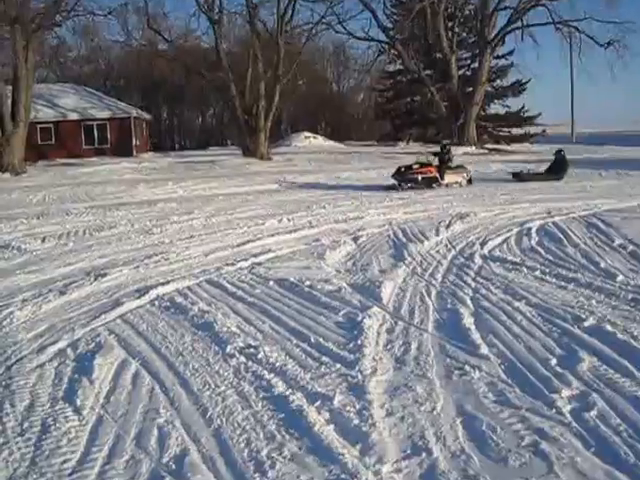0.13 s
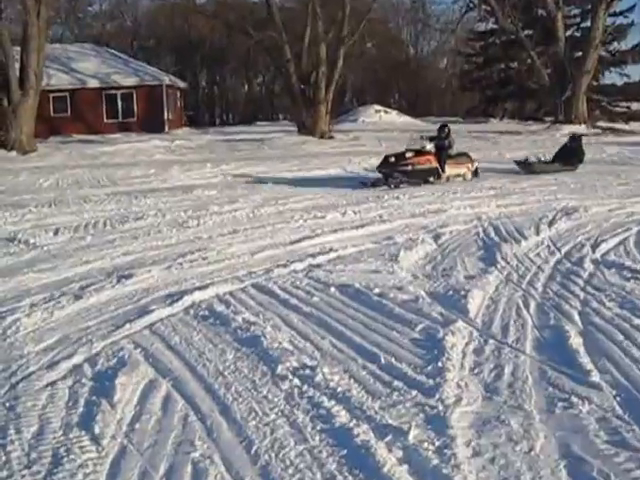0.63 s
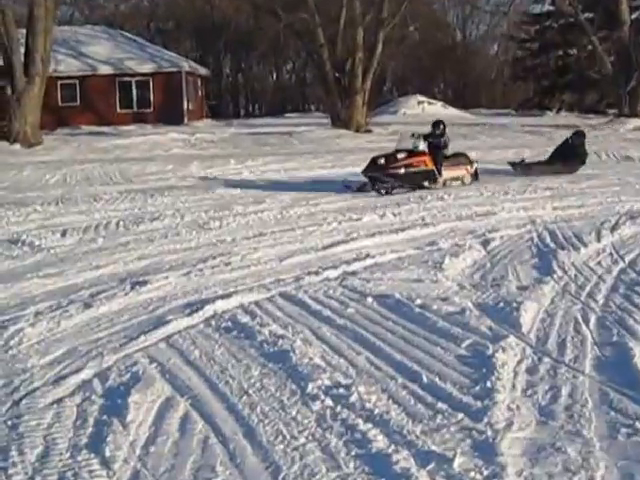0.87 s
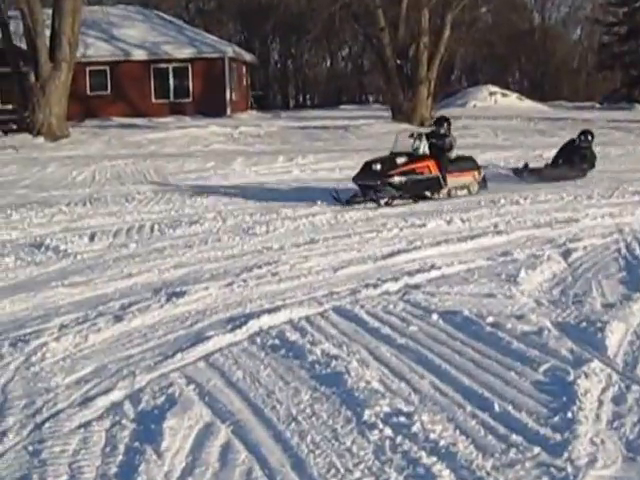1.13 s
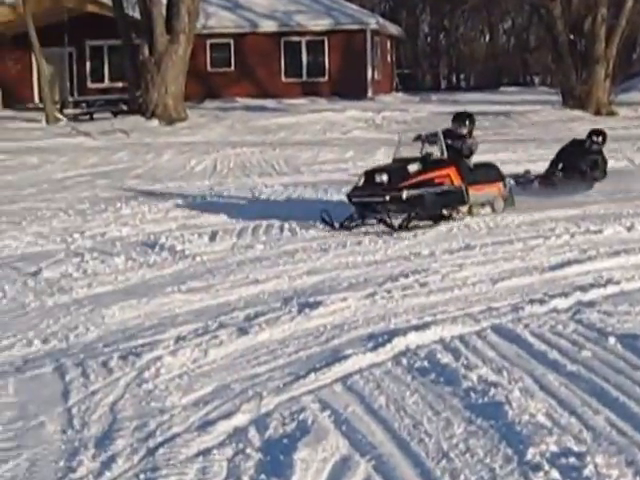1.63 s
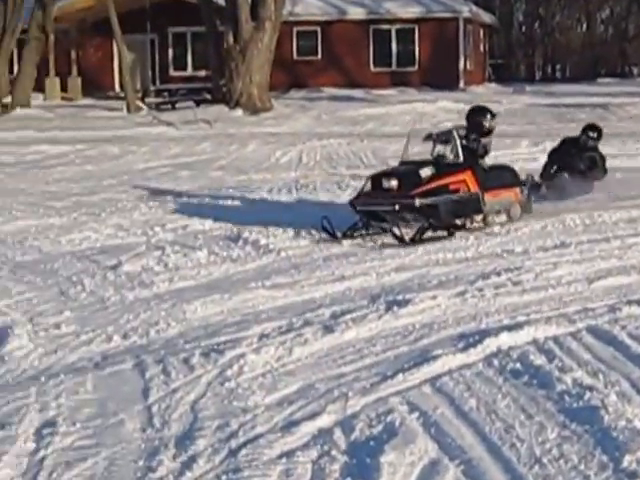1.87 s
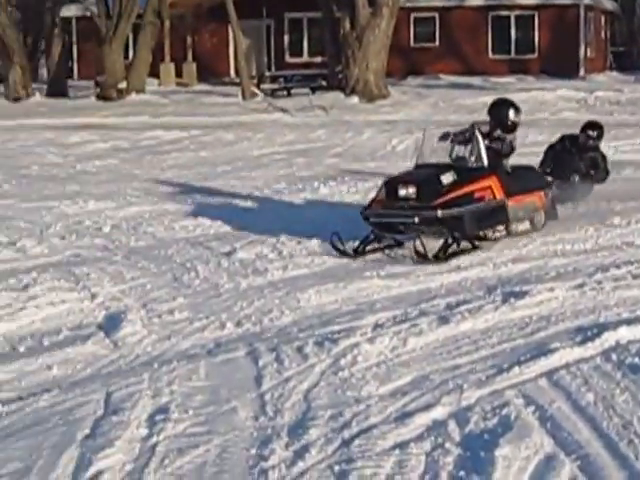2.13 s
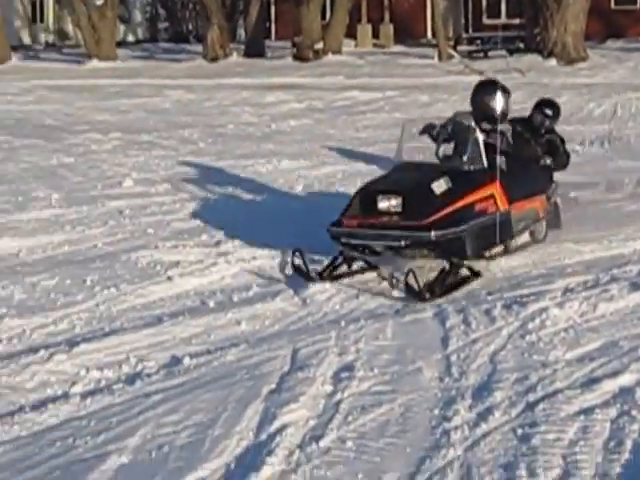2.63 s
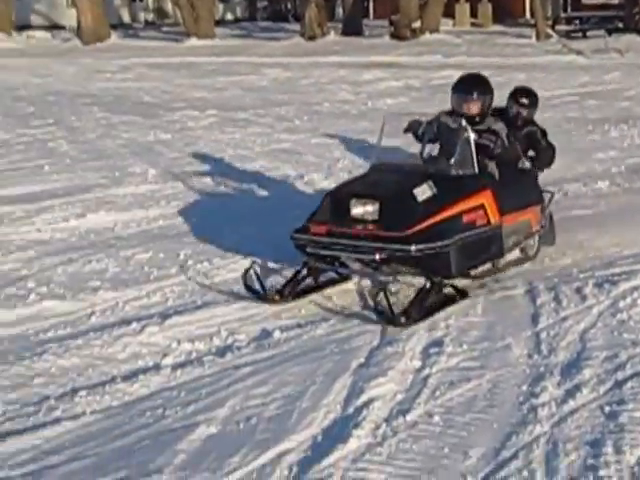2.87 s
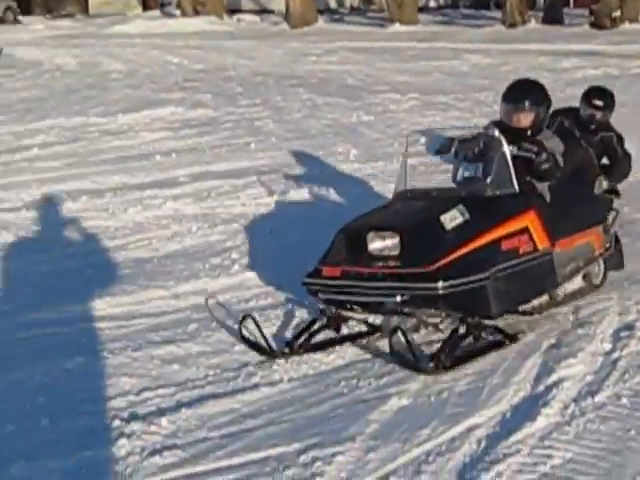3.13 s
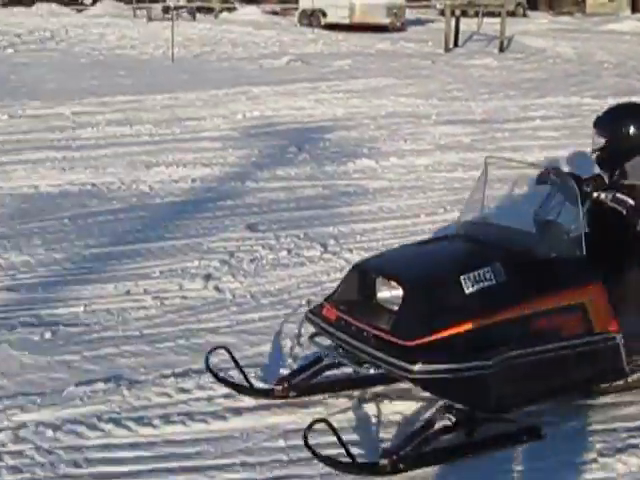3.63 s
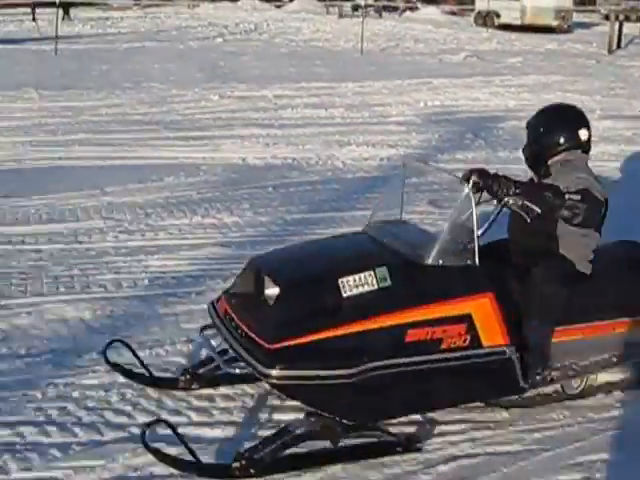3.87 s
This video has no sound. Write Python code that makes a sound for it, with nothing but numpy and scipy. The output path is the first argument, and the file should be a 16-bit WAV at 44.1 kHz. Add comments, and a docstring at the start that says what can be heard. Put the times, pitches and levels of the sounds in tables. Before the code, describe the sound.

A two-stroke snowmobile engine buzzes closer across snow, drops pitch and sputters, then catches again.

```python
"""A two-stroke snowmobile comes across a snowy yard and passes close; near the listener it misfires, then
catches again. Low exhaust orders are clean tones, the buzz is a stack of higher orders, and the roar and
hiss are noise gated by the firing; buzz and roar arrive with a short inverted echo. Puffs of gas mark relighting.
The hand-held camera clicks now and then and a finger slips on it: short rings with noise, and a scrape of
band noise. Loud clicks overload the input and duck its gain control."""
import sys
import numpy as np
from scipy import signal
from scipy.fft import rfft, irfft, next_fast_len
from scipy.io import wavfile
from scipy.ndimage import map_coordinates

SR = 44100
rng = np.random.default_rng(int(sys.argv[2]) if len(sys.argv) > 2 else 0)


def ratio_of_db(decibels):
    """Turn decibels (scalar or array-like) into linear amplitude factors; 0 dB maps to 1."""
    return 10 ** (np.asarray(decibels, float) / 20)


def to_wav(sig):
    """Store sig (one row per channel, or 1-D mono) as 16-bit WAV at the path in sys.argv[1].

    Samples outside -1..1 are clipped; the rate is SR.
    """
    pcm = np.clip(np.atleast_2d(sig), -1, 1) * 32767
    pcm = np.round(pcm).astype(np.int16)
    wavfile.write(sys.argv[1], SR, pcm.T)  # frames by channels


N = 176400

# Engine firing rate. Each row: time in seconds, rate in Hz.
FIRING_RATE_HZ = [(0.04, 78.53), (0.2, 79.66), (0.33, 79.5), (0.84, 81.53), (1.1, 82.7), (1.18, 83.95),
                  (1.29, 84.3), (1.42, 85.7), (1.46, 87.1), (1.54, 88.2), (1.67, 85), (1.87, 86.23),
                  (1.97, 85.76), (2.06, 85.3), (2.2, 87.4), (2.48, 86.72), (2.64, 84.94), (2.73, 85.8),
                  (2.91, 87.64), (2.95, 87.2), (3.01, 86.16), (3.16, 78.6), (3.25, 76.25), (3.38, 74.68),
                  (3.55, 74.15), (3.76, 76.1), (3.83, 75.76), (3.88, 75.9), (4.0, 76.5)]
# Approach. Each row: time in seconds, roar, buzz and hiss rms in dB before echo and misfires, nearness 0-1.
APPROACH = [(0, -30.5, -29.5, -38, 0.46), (.3, -29, -27.5, -35.5, 0.12), (.8, -27, -26.5, -36.5, 0.36),
            (1.3, -25.5, -23.5, -37, 0.4), (1.8, -19.5, -16, -28.5, 0.37), (2.4, -22.5, -20, -31.5, 0.59),
            (2.9, -24, -26, -35.5, 0.88), (3.2, -22, -29.5, -37.5, 0.98), (3.6, -22, -26, -32.5, 0.94),
            (4, -23.5, -26, -34.5, 0.8)]
# Exhaust orders before misfires. Each row: time in seconds, rms of orders 1, 2, 3 and 4 in dB.
ORDER_LEVELS_DB = [(0, -24.5, -32.5, -38.5, -42.5), (.3, -22.5, -31, -36, -41.5),
                   (.8, -22.5, -31.5, -39, -38.5), (1.3, -20.5, -28, -38.5, -37.5),
                   (1.8, -17, -23.5, -33.5, -30.5), (2.4, -20, -25.5, -35, -35.5),
                   (2.9, -23, -28, -36, -36.5), (3.2, -28.5, -27.5, -30.5, -34), (3.55, -20, -24, -24, -32),
                   (3.8, -20.5, -25, -24, -31), (4, -21.5, -23, -23, -27.5)]
# One value per exhaust order: phase in radians.
ORDER_PHASE_RAD = [3.1, 4.2, 5.6, 5.0]
# One value per exhaust order: spread of the random level in dB.
ORDER_WOBBLE_DB = [.8, 1.3, 1.6, 2.5]
# One value per exhaust order: share of the misfire dip that it follows, 0-1.
ORDER_MISFIRE_SHARE = [1, 0.041, 0.77, 0.36]
# Misfires, while the charge does not light. Each row: start in seconds, end in seconds, dip in dB.
MISFIRES = [(3.015, 3.058, -18), (3.1, 3.225, -17), (3.25, 3.278, -22), (3.318, 3.362, -22),
            (3.392, 3.428, -24), (3.46, 3.478, -10)]
# Puffs of gas as the charge lights again. Each row: start in seconds, length in seconds, level in dB.
PUFFS = [(3.082, .02, -43), (3.29, 0.025, -35), (3.367, 0.026, -33), (3.427, 0.032, -32.5),
         (3.479, 0.027, -33)]
# Buzz line levels, far and near. Each row: frequency in Hz, relative level in dB.
BUZZ_FAR_COLOUR = [(250, -28), (400, -18), (600, -1), (900, -17), (1100, -2), (1250, 4), (1450, 1.5),
                   (1700, -9.5), (2000, -12), (2500, -11), (3100, -6), (3600, -17), (4500, -15)]
BUZZ_NEAR_COLOUR = [(250, -12), (400, 6.5), (600, -6.5), (800, 6.5), (1000, 2), (1300, 4), (1700, -3.5),
                    (2200, -15.5), (2800, -2), (3600, -24), (4500, -10)]
# Noise spectra. Each row: frequency in Hz, relative density in dB per Hz.
ROAR_FAR_COLOUR = [(25, -2), (60, -9), (120, 4), (300, -19.5), (500, 4.5), (700, -7), (900, -4), (1400, -6),
                   (2200, -2), (3200, -11), (4500, -11.5), (5700, -11.5), (7000, -40)]
ROAR_NEAR_COLOUR = [(25, -19), (60, -25), (120, 13), (300, -2.5), (600, 4.5), (900, 1.5), (1400, 1),
                    (2200, -4.5), (2800, -6.5), (3400, -8.5), (4500, -10.5), (5700, -14.5), (7000, -28.5)]
HISS_COLOUR = [(4500, -2), (6000, 0), (7000, -7.5), (8500, -1), (10500, -6), (13000, -13.5), (15500, -7),
               (16500, -29)]
PUFF_COLOUR = [(2500, 1), (4000, -18), (6700, -6), (8500, -3), (13000, -7), (15500, -19), (16500, -37)]
# Echo delay. Each row: time in seconds, lag in ms.
ECHO_LAG_MS = [(0, 1.77), (1.5, 1.72), (2, 1.68), (2.5, 1.61), (3, 1.54), (3.5, 1.45), (4, 1.33)]
# Camera body clicks before the gain control. Each row: start in seconds, ring level in dB, ring frequency
# in Hz, ring T60 in seconds, crack level in dB relative to the ring, before the crack's band filter.
CLICKS = [(.2864, 7, 3790, .0046, -11), (1.3685, -9, 4400, .004, -12), (1.3752, -4, 3500, .004, -7),
          (1.4045, 19, 2440, .010, 4), (1.6503, -2, 800, .009, -30), (3.2585, -8, 3600, .003, -3)]
# Finger slip, one row: start in seconds, end in seconds, level at the end in dB, centre in Hz, width in Hz.
SLIP = (1.395, 1.4022, -13, 3100, 1800)


def in_time(rows):
    """Interpolate the columns of a time table to every sample."""
    time_s, *columns = np.transpose(rows)
    return [np.interp(np.arange(N) / SR, time_s, column) for column in columns]


def rms_one(x):
    """Scale to rms 1."""
    return x / np.sqrt(np.mean(x ** 2) + 1e-20)


def colour(x, points):
    """Minimum-phase filter that follows a spectrum table; rms 1."""
    size = next_fast_len(N + 8192)
    table_hz, table_db = np.transpose(points)
    bin_hz = np.arange(size // 2 + 1) * SR / size
    log_gain = np.interp(np.log(bin_hz + 1), np.log(table_hz), table_db) * np.log(10) / 20
    # Folding the cepstrum onto positive time gives the minimum phase.
    cepstrum = irfft(log_gain, size)
    cepstrum[1:size // 2] *= 2
    cepstrum[size // 2 + 1:] = 0
    response = np.exp(rfft(cepstrum))
    return rms_one(irfft(rfft(x, size) * response, size)[:N])


def drift(rate_hz, count=1):
    """Random change with spread 1 from a double pole at rate_hz, at every 40th sample."""
    r = np.exp(-2 * np.pi * rate_hz * 40 / SR)
    noise = rng.standard_normal((count, N // 40 + 2002))
    slow = signal.lfilter([1], [1, -2 * r, r * r], noise)[:, 2000:]
    return slow / slow.std(axis=1, keepdims=True)


def full(slow):
    """Interpolate from every 40th sample to every sample."""
    return np.interp(np.arange(N) / 40, np.arange(slow.size), slow.ravel())


def window(start_s, end_s, edge_s):
    """1 between start and end, with linear edges."""
    t = np.arange(N) / SR
    return np.clip(np.minimum(t - start_s, end_s - t) / edge_s + .5, 0, 1)


def exhaust_orders(turns, dip_db):
    """The four lowest harmonics of the firing as tones with wandering levels."""
    out = np.zeros(N)
    for k, level_db in enumerate(in_time(ORDER_LEVELS_DB)):
        wobble_db = ORDER_WOBBLE_DB[k] * full(drift(18.4))
        gain = ratio_of_db(level_db + ORDER_MISFIRE_SHARE[k] * dip_db + wobble_db)
        out += np.sqrt(2) * gain * np.cos(2 * np.pi * (k + 1) * turns + ORDER_PHASE_RAD[k])
    return out


def line_level_db(line_hz, points):
    """Level of each line from a colour table, on a log frequency axis."""
    table_hz, table_db = np.transpose(points)
    return np.interp(np.log(line_hz), np.log(table_hz), table_db)


def buzz(turns, rate_hz, near):
    """Higher firing orders, loosely in step so that each firing still makes a downward pulse; rms 1."""
    numbers = np.arange(5, 52)
    phase_spread_rad, wobble_db, flutter_db = .95, 2.5, 1.8
    whine_order, whine_db = 24, 8  # one order stands out as a whine
    k = numbers[:, None]
    line_hz = k * rate_hz[::40]
    far_db = line_level_db(line_hz, BUZZ_FAR_COLOUR)
    near_db = line_level_db(line_hz, BUZZ_NEAR_COLOUR)
    level_db = far_db + (near_db - far_db) * near[::40] ** 2 + whine_db * (k == whine_order)
    chance_db = wobble_db * drift(2.0, len(k)) + flutter_db * drift(30.0, len(k))
    gains = ratio_of_db(level_db + chance_db[:, :level_db.shape[1]])
    phases_rad = phase_spread_rad * rng.standard_normal(len(k))
    lines = np.zeros(N)
    for n, gain, phase in zip(numbers, gains, phases_rad):
        lines += full(gain) * np.cos(2 * np.pi * n * turns + phase)
    return -rms_one(lines)


def gated_noise(turns, depth):
    """Noise that swells with each firing and flutters at random."""
    gate = 1 + depth * np.cos(2 * np.pi * turns)
    flutter_db = 1.0 * full(drift(18.0))
    return rng.standard_normal(N) * gate * ratio_of_db(flutter_db)


def roar(turns, near):
    """Firing-gated gas noise whose colour crossfades from far to near; rms 1."""
    gas = gated_noise(turns, depth=.25)
    return rms_one((1 - near) * colour(gas, ROAR_FAR_COLOUR) + near * colour(gas, ROAR_NEAR_COLOUR))


def echo(x, lag_ms, near):
    """Add an inverted copy of the middle range that arrives just after, weaker close by."""
    middle = signal.butter(1, [1080, 4640], "band", fs=SR, output="sos")
    band = signal.sosfiltfilt(middle, x)
    share_far, share_near = .85, .55
    share = share_far + (share_near - share_far) * near
    late = map_coordinates(band, [np.arange(N) - lag_ms * SR / 1000], order=3)
    return x - share * late


def hiss(turns):
    """Treble noise slightly gated by the firing; rms 1."""
    return colour(gated_noise(turns, depth=0.033), HISS_COLOUR)


def snowmobile():
    """Orders, buzz, roar and hiss share one firing phase; each follows the misfires by its own share."""
    rate_hz, = in_time(FIRING_RATE_HZ)
    turns = np.cumsum(rate_hz) / SR  # firing cycles
    roar_db, buzz_db, hiss_db, near = in_time(APPROACH)
    lag_ms, = in_time(ECHO_LAG_MS)
    dip_db = misfire_dip_db()
    body = ratio_of_db(roar_db + 0.033 * dip_db) * roar(turns, near)
    body += ratio_of_db(buzz_db + 0.16 * dip_db) * buzz(turns, rate_hz, near)
    treble = ratio_of_db(hiss_db + 0.12 * dip_db) * hiss(turns)
    return exhaust_orders(turns, dip_db) + echo(body, lag_ms, near) + treble


def camera_clicks():
    """Each knock of the camera body is a short decaying ring with a bright noise crack."""
    out, t = np.zeros(N + SR), np.arange(2000) / SR
    crack_t60_s = .005
    bright = signal.butter(1, [3000, 10000], "band", fs=SR, output="sos")
    for start_s, level_db, ring_hz, ring_t60_s, crack_db in CLICKS:
        ring = -np.sin(2 * np.pi * ring_hz * t) * ratio_of_db(-60 * t / ring_t60_s)
        noise = signal.sosfilt(bright, rng.standard_normal(2000))
        crack = noise * ratio_of_db(crack_db - 60 * t / crack_t60_s)
        first = int(start_s * SR)
        out[first:first + 2000] += ratio_of_db(level_db) * (ring + crack)
    return out[:N]


def finger_slip():
    """A finger slips just before the loudest click: band noise that swells and breaks off."""
    start_s, end_s, level_db, centre_hz, width_hz = SLIP
    t = np.arange(N) / SR
    edges_hz = [centre_hz - width_hz / 2, centre_hz + width_hz / 2]
    band = signal.butter(2, edges_hz, "band", fs=SR, output="sos")
    swell = np.clip((t - start_s) / (end_s - start_s), 0, 1)
    release = np.clip(1 - (t - end_s) / .002, 0, 1)
    scrape = rms_one(signal.sosfilt(band, rng.standard_normal(N)))
    return ratio_of_db(level_db) * swell * release * scrape


def misfire_dip_db():
    """Level dip in dB while the charge does not light."""
    return sum(depth_db * window(start_s, end_s, .006) for start_s, end_s, depth_db in MISFIRES)


def relight_puffs():
    """Bursts of coloured gas noise as the charge lights again."""
    gain = sum(ratio_of_db(db) * window(start_s, start_s + length_s, 0.0061) for start_s, length_s, db in PUFFS)
    return gain * colour(rng.standard_normal(N), PUFF_COLOUR)


def scene():
    """Machine and camera, one channel."""
    return (snowmobile() + camera_clicks() + finger_slip() + relight_puffs())[None]


def roll_off(x):
    """The treble ends steeply here."""
    return signal.sosfilt(signal.butter(12, 15710, fs=SR, output="sos"), x)


def record(dry):
    """Peaks over the limit pull the gain down, it creeps back; the input clips and opens a moment late."""
    limit_db, attack_s, recover_db_per_s, open_s = 0.1, .0022, 20, .0355
    t = np.arange(N) / SR
    over_db = np.maximum(20 * np.log10(np.abs(dry[0]) + 1e-9) - limit_db, 0)
    # Hold each peak while it falls at the recovery rate.
    recovery_db = recover_db_per_s * t
    held_db = np.maximum.accumulate(over_db + recovery_db) - recovery_db
    r = np.exp(-1 / (attack_s * SR))
    cut_db = signal.lfilter([1 - r], [1, -r], held_db)
    gain = ratio_of_db(-cut_db) * (t > open_s)
    clipped = np.clip(dry * gain, -1, 1)
    lowpass = signal.cheby2(10, 50, 15650, fs=SR, output="sos")
    mix = np.clip(signal.sosfilt(lowpass, clipped), -1, 1)
    return roll_off(mix)


dry = scene()
out = record(dry)
to_wav(out)
```